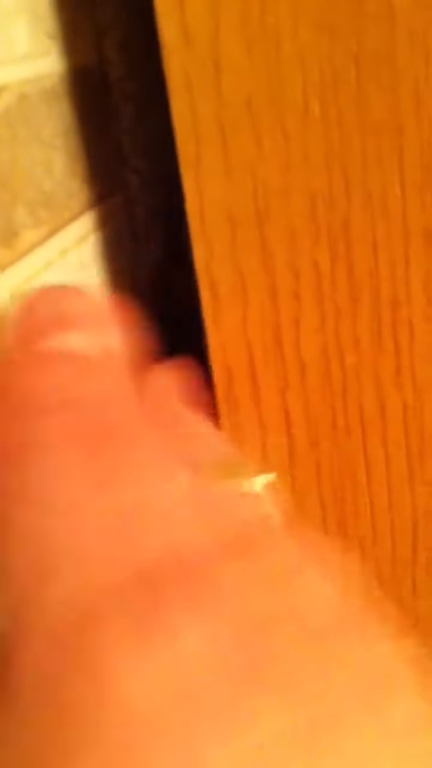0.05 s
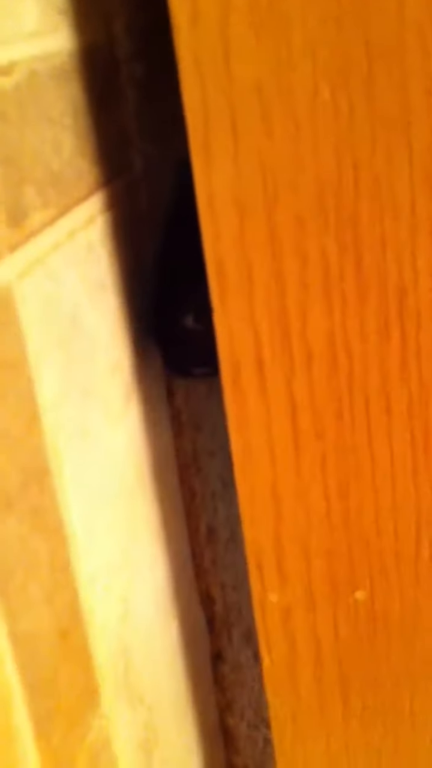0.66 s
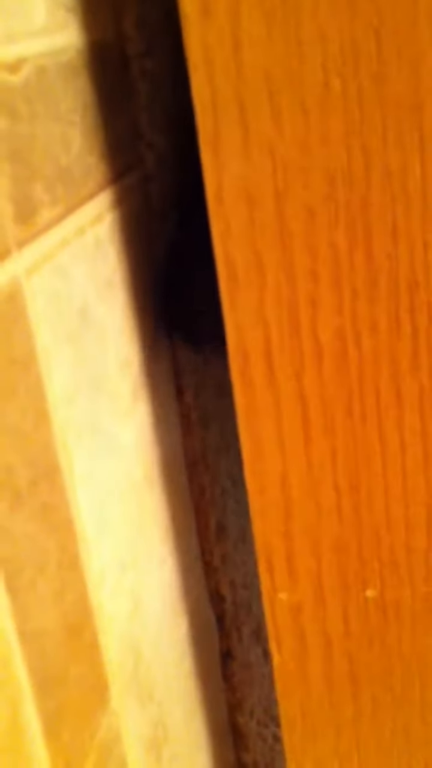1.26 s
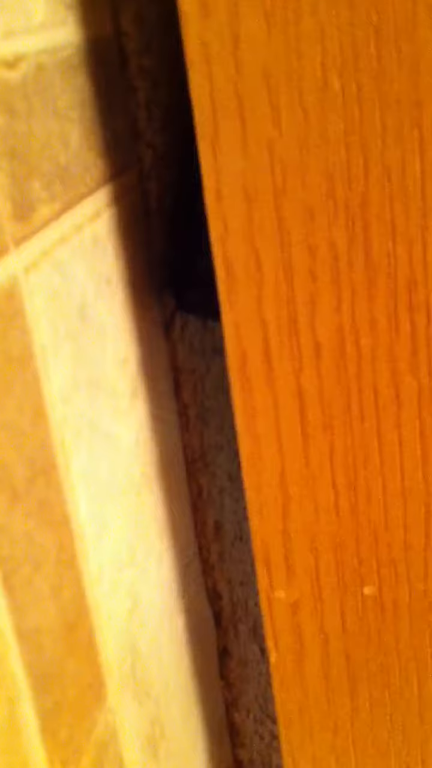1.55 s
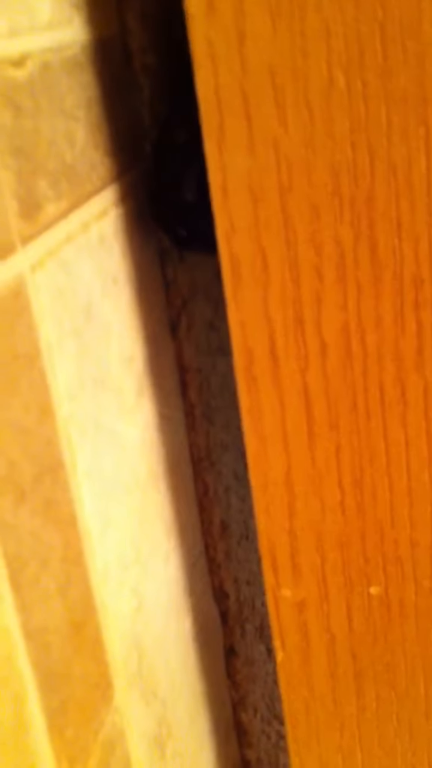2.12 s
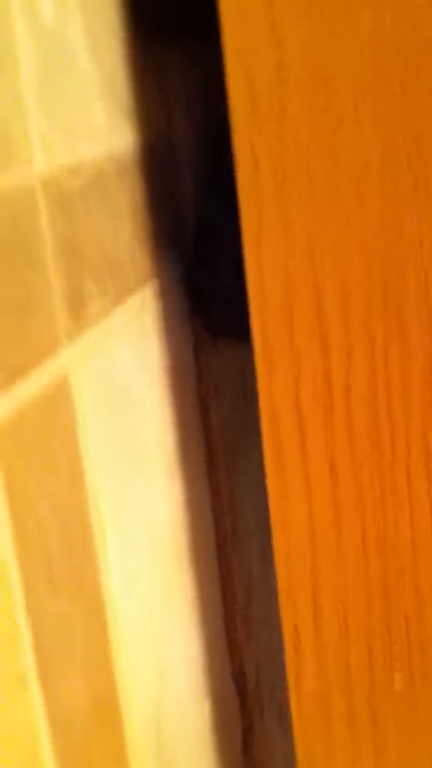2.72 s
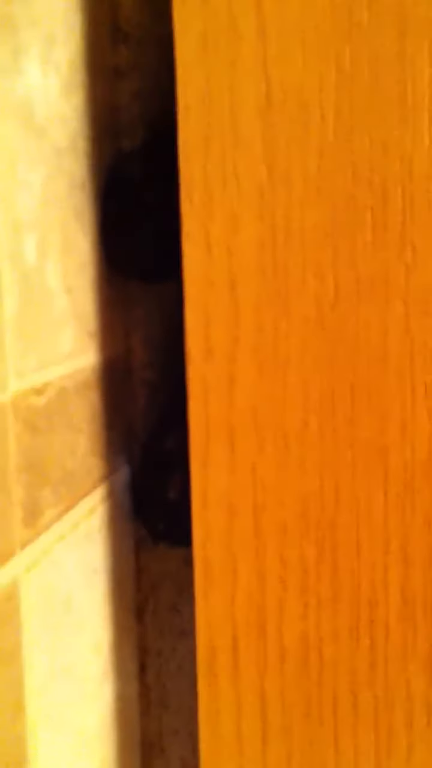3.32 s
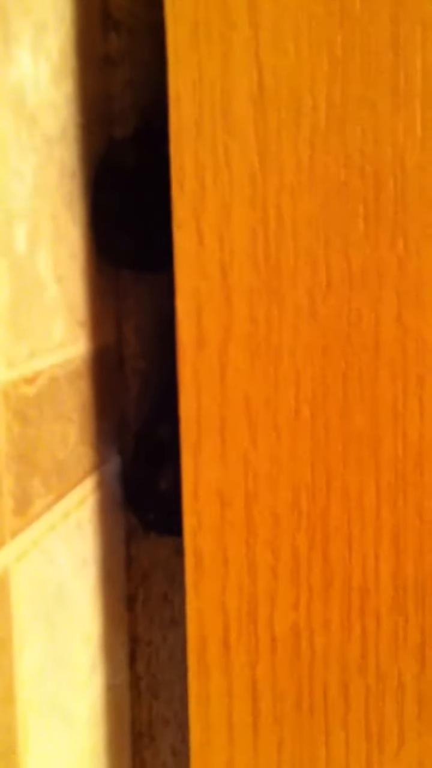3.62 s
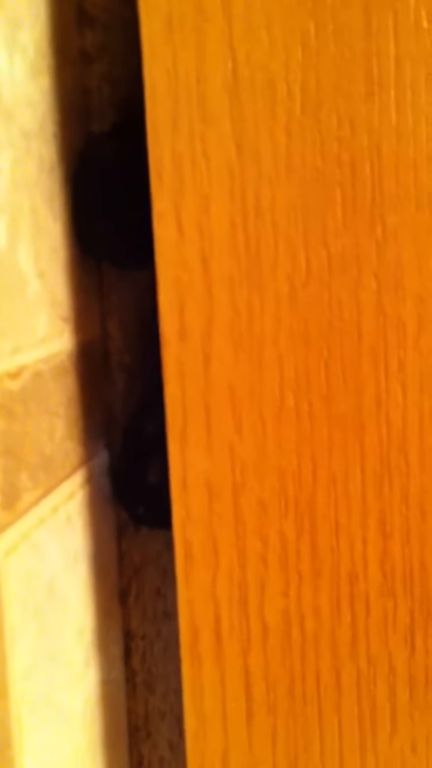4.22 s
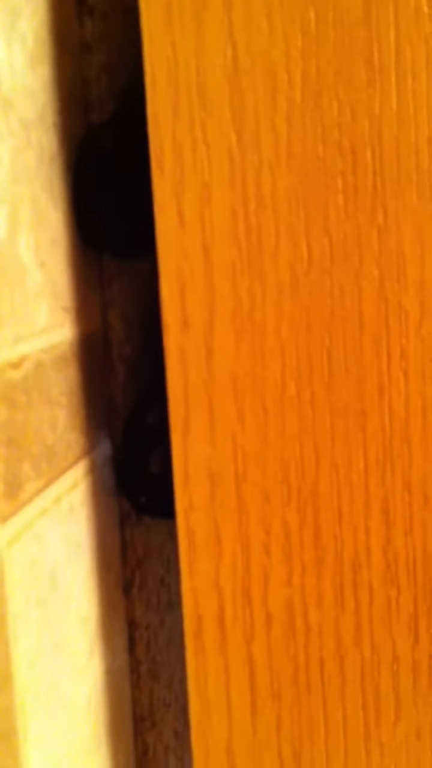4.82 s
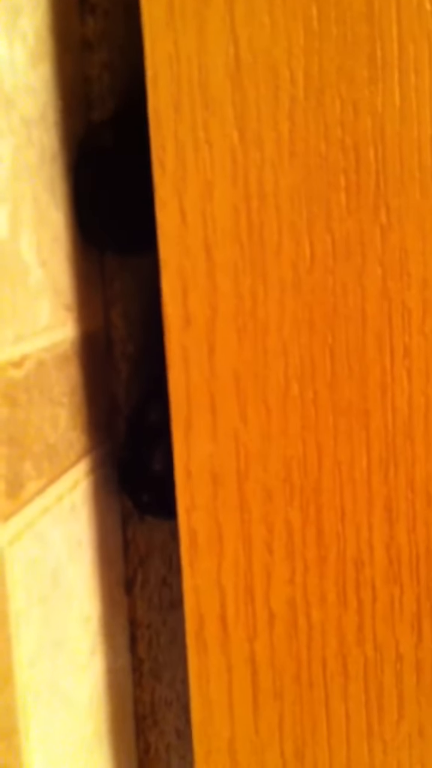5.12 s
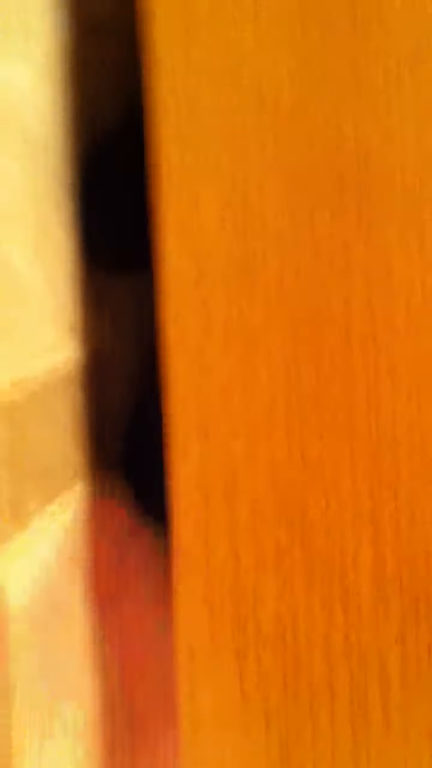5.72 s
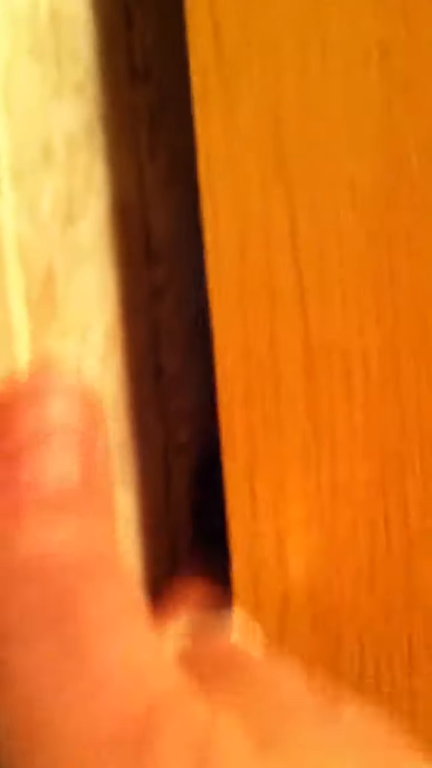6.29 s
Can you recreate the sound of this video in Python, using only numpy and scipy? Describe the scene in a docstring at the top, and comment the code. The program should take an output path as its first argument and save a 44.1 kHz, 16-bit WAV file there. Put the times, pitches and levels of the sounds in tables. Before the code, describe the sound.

A loose wooden door clacks three times in its frame in the first half second, while a hand drags and brushes over the wood. From about 1.0 to 2.8 seconds, four fingers drum eight quick rolls on the door's edge, roughly four rolls a second. Each tap is a faint nail tick followed by a soft thump that briefly rings the panel. A few light touches trail off by 3.2 seconds. In the pause there is only quiet hiss, a very faint thin whine and a slight swell of distant hum around 4.3 seconds. A small click at 5.0 leads into three firmer rolls, lasting until 5.6. Sharp wooden knocks follow, loudest in a tight cluster at 6.0, then lighter knocks and skin sliding off the wood until about 6.3. Everything is close to the microphone, with the short echo of a small tiled room.

```python
"""Fingers drumming on a wooden door

Close microphone, small tiled room. Four fingers roll on the door's edge, eight times and then three more.
Each tap is a faint nail tick, then a soft push of the fingertip that thumps the panel and rings it.
At the start the loose door clacks in its frame; a hand drags and slides on the wood, and knocks near the
end. Underneath lie a quiet hiss, a thin whine and one faint swell of far-off hum."""
import sys
import numpy as np
from scipy import signal
from scipy.fft import rfft, irfft
from scipy.io import wavfile

SR = 44100
rng = np.random.default_rng(int(sys.argv[2]) if len(sys.argv) > 2 else 0)


def master(y):
    """Save y as 16-bit WAV."""
    cut = np.clip(np.atleast_2d(y).T, -1, 1)
    pcm = np.round(cut * 32767)  # scale
    wavfile.write(sys.argv[1], SR, pcm.astype(np.int16))


N = 280023
TIME = np.arange(N) / SR

# The tiled room's decay. Each row: frequency in Hz, time to fall 60 dB in seconds.
ROOM_DECAY = [(100, 0.82), (400, 0.25), (1000, 0.55), (3000, 0.39), (12000, 0.034)]
# Spectra of the room air, a clack, a blow on wood, sliding skin and a nail tick.
# Each row: frequency in Hz, relative level in dB.
AIR_COLOUR = [(15, -86), (25, -18), (44, -24), (87, -35), (102, -12), (123, -5.5), (153, -12.5), (236, -7),
              (326, -12.5), (416, -8.5), (560, -17.5), (863, -17), (2760, -21), (14800, -25), (16000, -23)]
CLACK_COLOUR = [(60, -26), (200, 3.5), (500, 11.5), (1000, 2), (1900, -1), (2500, -9.5), (4000, -16),
                (7000, -25.5), (16000, -45)]
WOOD_COLOUR = [(60, -7.5), (130, 1), (220, 2.5), (300, -2.5), (400, 0), (660, -6.5), (830, -9.5),
               (1040, -7.5), (1600, -17), (2600, -15.5), (4000, -17.5), (8000, -25), (16000, -20.5)]
SLIDE_COLOUR = [(700, -19), (1100, 2), (1350, 12), (1900, 4.5), (2700, 7.5), (3500, 3.5), (4500, 6.5),
                (6500, 2.5), (11000, 3.5), (14000, 2.5), (16000, -22)]
TICK_COLOUR = [(300, 1), (900, 9), (1400, 2.5), (2000, 11.5), (2700, 5), (3600, 2.5), (4600, 1), (6200, 0),
               (11000, 2.5), (16000, -8)]
# Modes of the frame and of the door's stile, hard edge and panel. Each row: frequency in Hz, relative level in
# dB, time to fall 60 dB in seconds.
FRAME_MODES = [(369, -6, 0.73), (515, -11, 1), (552, -15, 0.26), (672, -4, 0.23), (950, -9, 0.08),
               (1030, 3, 0.11), (1255, 4, 0.081), (1403, 11, 0.077), (1660, -20, 0.075), (1950, 5.5, 0.072)]
STILE_MODES = [(186, -2, 0.18), (305.4, 5.5, .17), (337, 3, 0.17), (570, -4.5, 0.16), (656.5, 5.5, 0.081),
               (1032, -13, 0.12), (1225, -17, 0.051)]
EDGE_MODES = [(1490, 8.5, 0.014), (2530, 3, 0.014), (3150, -2.5, 0.013), (4150, -19, 0.019)]
PANEL_MODES = [(118, -18, .15), (142, -21, .38), (179, -14.5, .38), (208, -15.5, .4), (253, -8, .11),
               (282, -25, .5), (309, -13, .18), (341, -25, .5), (373, -15, .44), (415, -2, .24),
               (443, -8, .11), (495, -16, .4), (547, -10, .45), (601, -17, .45), (650, -14, .35),
               (696, -2, .28), (806, -14, .3), (886, -5, .2), (985, 0, .13), (1040, 0, .17)]
# The loose door meeting its frame. Each row: start in seconds, level in dB.
CLACKS = [(.002, -21), (.162, -15), (.331, -18)]
# Skin brushing lightly over the varnish, and fingers flicking off it.
# Each row: peak time in seconds, level in dB, swell length in seconds.
BRUSHES = [(0.13, -66, 0.36), (0.574, -49, 0.058), (1.38, -69.5, 0.52), (5.728, -58, 0.051),
           (6.008, -64.5, 0.48)]
FLICKS = [(1.811, -62.5, 0.071), (1.932, -58, 0.07), (6.07, -46, 0.036), (6.2505, -34, 0.0035),
          (6.264, -55, 0.087)]
# Pressed skin dragging on the wood, building up and letting go.
# Each row: peak time in seconds, level in dB, swell length in seconds, upper cutoff in Hz.
DRAGS = [(0.11, -46.5, 0.14, 180), (0.141, -51.5, 0.087, 2720), (0.306, -57, 0.17, 198),
         (0.568, -47, .02, 4460), (5.765, -53, 0.043, 2200), (5.984, -49, 0.15, 1710),
         (6.206, -54, 0.11, 284), (6.302, -58, 0.11, 7200)]
# Knocks of a nail or ring, crisp when square-on, crunchy when glancing.
# Each row: start in seconds, level in dB, upper cutoff in Hz, crunch decay in ms.
KNOCKS = [(4.973, -32.5, 9100, 3.3), (5.659, -20.5, 7500, 5), (5.7258, -14.5, 4470, 2.7),
          (5.9102, -20, 1980, 0.36), (5.9823, -13.5, 1700, 2.2), (5.993, -10, 1990, 1.1),
          (6.0033, -8.5, 2350, 1.4), (6.009, -13, 1010, 1.5), (6.184, -25, 910, 4), (6.202, -25, 9200, 3.4)]
# Single fingers barely touching. Each row: time in seconds, push in dB, half-width of the push in ms.
TOUCHES = [(2.8417, -26.5, 0.66), (3.075, -39, 1.1), (3.188, -37, 1.46)]
# The four fingers in landing order, at a usual push.
# Each row: half-width of the push in ms, relative tick level in dB, typical graze decay in ms.
FINGERS = [(.45, -49, 2.2), (.66, -49, 2.2), (.67, -49.5, 2), (.84, -44.5, .9)]
# The drumming. Each row: one roll, with a time in seconds and a push in dB for each finger.
ROLLS = [
    [(1.0316, -19.5), (1.059, -28.5), (1.098, -17.5), (1.1481, -13)],
    [(1.2379, -14), (1.2675, -21), (1.307, -14.5), (1.3717, -15)],
    [(1.4778, -19), (1.4918, -12.5), (1.534, -14.5), (1.5931, -16)],
    [(1.6877, -26), (1.7105, -16), (1.7508, -17), (1.8104, -15)],
    [(1.921, -13), (1.9419, -15.5), (1.9749, -16), (2.0273, -13)],
    [(2.1441, -15), (2.169, -13.5), (2.1996, -16), (2.2665, -13.5)],
    [(2.3761, -14), (2.4043, -17.5), (2.4444, -15.5), (2.4949, -17)],
    [(2.6155, -17), (2.6392, -16), (2.6616, -16), (2.7232, -19.5)],
    [(5.1023, -23.5), (5.1209, -14.5), (5.1424, -15.5), (5.2185, -11)],
    [(5.3146, -10), (5.3337, -12), (5.3744, -13.5), (5.4483, -9.5)],
    [(5.5371, -11), (5.5559, -12), (5.5958, -15.5), (5.6625, -38)],
]


def undb(db):
    """Decibels to gain."""
    return 10 ** (np.asarray(db) / 20)


def lookup(points, hz):
    """Read (Hz, value) points on a log-frequency axis."""
    f, value = np.transpose(points)
    return np.interp(np.log(np.maximum(hz, 1)), np.log(f), value)


def unit(x):
    """Scale to unit energy."""
    return x / np.sqrt(np.sum(x ** 2))


def convolve(x, response):
    """Pass a sound through an impulse response."""
    return signal.fftconvolve(x, response)[:len(x)]


def colour(points, size=4096):
    """Minimum-phase, unit-energy response with the given spectrum."""
    gain = undb(lookup(points, np.fft.rfftfreq(size, 1 / SR)))
    cepstrum = irfft(np.log(gain))
    cepstrum[1:size // 2] *= 2
    cepstrum[size // 2 + 1:] = 0
    return unit(irfft(np.exp(rfft(cepstrum))))


def cut(x, hz, kind="low", order=2):
    """Butterworth filter."""
    sos = signal.butter(order, np.minimum(hz, SR / 2 - 1), kind, fs=SR, output="sos")
    return signal.sosfilt(sos, x)


def add(track, s, sound):
    """Mix a sound in at s seconds."""
    i = max(int(s * SR), 0)
    track[i:i + len(sound)] += sound[:max(N - i, 0)]


def swell(peak_s, length_s, rise_share):
    """Exponential rise to a peak and fall from it; the two time constants add up to length_s."""
    rise = (peak_s - TIME) / rise_share
    fall = (TIME - peak_s) / (1 - rise_share)
    return np.exp(-np.maximum(rise, fall) / length_s)


def ring(modes, t):
    """Decaying modes; neighbours swing in opposite directions."""
    return sum((-1) ** k * undb(db - 60 * t / t60) * np.sin(2 * np.pi * hz * t)
               for k, (hz, db, t60) in enumerate(modes))


def room(onset_s=0.00082):
    """Dense reflections from nearby tiles and walls; the highest treble dies first."""
    t, tail = TIME[:SR], 0
    for hz in 62.5 * 2 ** np.arange(9):
        octave = cut(rng.standard_normal(SR), [hz / np.sqrt(2), hz * np.sqrt(2)], "band")
        tail = tail + octave * undb(-60 * t / lookup(ROOM_DECAY, hz))
    return unit(tail * (1 - np.exp(-(t / onset_s) ** 2)))


def background(hum_hz=410, lift_hz=18.2, whine_hz=15000):
    """Room air and microphone hiss, an electronic whine, and a far-off hum that sharpens as it swells."""
    hiss = undb(-67.5) * convolve(rng.standard_normal(N), colour(AIR_COLOUR))
    strength = swell(peak_s=4.25, length_s=.35, rise_share=.65)
    hum_phase = 2 * np.pi * np.cumsum(hum_hz + lift_hz * strength) / SR
    hum = undb(-70) * strength * np.sin(hum_phase)
    whine = undb(-88) * np.sin(2 * np.pi * whine_hz * TIME)
    return hiss + hum + whine


def clacks(walls, ring_db=-3, room_db=-1):
    """The door meets its frame further from the microphone, so ring and room rival the blow."""
    blows = np.zeros(N)
    for s, db in CLACKS:
        add(blows, s, undb([db]))
    crack = convolve(blows, colour(CLACK_COLOUR))
    frame = convolve(blows, unit(ring(FRAME_MODES, TIME[:SR])))
    return crack + undb(ring_db) * frame + undb(room_db) * convolve(crack, walls)


def friction(grain_db=2.5):
    """Skin catches and slips in tiny grains of uneven strength."""
    grains = rng.standard_normal(N) * undb(grain_db * rng.exponential(size=N))
    return grains / grains.std()


def rubbing(walls, drag_octaves=3.8, room_db=-6):
    """A hand moves over the door: light skin only hisses, pressed skin rasps the wood."""
    hiss = convolve(friction(), colour(SLIDE_COLOUR))
    brushing = sum(undb(db) * swell(s, length, rise_share=.45) for s, db, length in BRUSHES)
    flicking = sum(undb(db) * swell(s, length, rise_share=.16) for s, db, length in FLICKS)
    sound = brushing * cut(hiss, 1000, "high") + flicking * cut(hiss, 3240, "high", order=4)
    for s, db, length, top_hz in DRAGS:
        wood = cut(colour(WOOD_COLOUR), top_hz)
        rasp = unit(cut(wood, top_hz / 2 ** drag_octaves, "high"))
        stroke = friction() * swell(s, length, rise_share=.93)
        sound += undb(db) * convolve(stroke, rasp)
    return sound + undb(room_db) * convolve(sound, walls)


def knocks(walls, crunch_gain=0.81, ring_db=-5, low_hz=190, room_db=-10):
    """A sharp blow with a short crunch rings the door's stile, and the room answers."""
    blows, t = np.zeros(N), TIME[:SR // 5]
    for s, db, top_hz, crunch_ms in KNOCKS:
        crunch = unit(rng.standard_normal(len(t)) * np.exp(-1000 * t / crunch_ms))
        blow = signal.unit_impulse(len(t)) + crunch_gain * crunch
        add(blows, s, undb(db) * cut(blow, top_hz))
    body = cut(convolve(blows, colour(WOOD_COLOUR)), low_hz, "high")
    stile = convolve(blows, unit(ring(STILE_MODES, t)))
    sound = body + undb(ring_db) * stile
    return sound + undb(room_db) * convolve(sound, walls)


def nail(graze_ms, decay_scatter=0.49, snap_gain=0.65, colour_scatter_db=2):
    """One nail contact: a snap and a brief graze, a little different each time."""
    t = TIME[:SR // 50]
    decay_s = graze_ms / 1000 * np.exp(decay_scatter * rng.standard_normal())
    graze = unit(rng.standard_normal(len(t)) * np.exp(-t / decay_s))
    snap = snap_gain * signal.unit_impulse(len(t))
    tint = [(hz, db + colour_scatter_db * rng.standard_normal()) for hz, db in TICK_COLOUR]
    return convolve(unit(snap + graze), colour(tint))


def edge(ticks, ring_db=-11):
    """Nail ticks together with the brief hollow ring of the door's edge."""
    hollow = convolve(ticks, unit(ring(EDGE_MODES, TIME[:SR // 10])))
    return ticks + undb(ring_db) * hollow


def panel(push, flex_hz=385, flex_width_hz=367, ring_db=41, spread_s=.004):
    """The wood gives way under the finger in one quick swing; then the whole panel rings."""
    omega, damping = 2 * np.pi * flex_hz, 2 * np.pi * flex_width_hz
    flex = signal.bilinear([1, 0, 0], [1, damping, omega ** 2], SR)
    thump = signal.lfilter(*flex, push)
    modes = ring(PANEL_MODES, np.maximum(TIME[:SR] - spread_s, 0))
    return undb(ring_db) * convolve(push, modes) / SR - thump


def taps(usual_push_db=-15, hardening=.27, tick_growth=.57, touch_tick_db=-29.5, touch_graze_ms=2.4):
    """Every fingertip contact. In a roll a harder push is shorter; the tick grows less than the push."""
    for roll in ROLLS:
        for (s, push_db), (width_ms, tick_db, graze_ms) in zip(roll, FINGERS):
            extra_db = push_db - usual_push_db
            width_scale = undb(-hardening * extra_db)
            yield s, push_db, width_ms * width_scale, tick_db + tick_growth * extra_db, graze_ms
    for s, push_db, width_ms in TOUCHES:
        yield s, push_db, width_ms, push_db + touch_tick_db, touch_graze_ms


def drumming(walls, crest_db=-36, stiffening=7, tick_boost_db=15, lead_widths=4):
    """Right by the microphone the nail grazes first, then the pad lands; a longer push sounds deeper."""
    pushes, nails, t = np.zeros(N), np.zeros(N), TIME[:SR // 50]
    for s, push_db, width_ms, tick_db, graze_ms in taps():
        width_s = width_ms / 1000
        bell = np.exp(-.5 * ((t - t.mean()) / width_s) ** 2)
        crest = undb(crest_db) * bell ** stiffening  # the pad stiffens as it flattens
        add(pushes, s - t.mean(), undb(push_db) * (bell + crest))
        add(nails, s - lead_widths * width_s, undb(tick_db + tick_boost_db) * nail(graze_ms))
    wood, ticks = panel(pushes), edge(nails)
    # the panel's bass stays near the door; its higher notes reach the walls
    to_walls = undb(-10) * cut(wood, 550, "high", order=1) + undb(-11) * ticks
    return wood + ticks + convolve(to_walls, walls)


def scene(port_hz=106):
    """One room, one microphone; its port cuts the contacts' bass steeply, leaving a little low thud."""
    walls = room()
    handling = cut(clacks(walls) + knocks(walls) + rubbing(walls), 111, "high")
    contacts = drumming(walls) + handling
    above_port = cut(contacts, port_hz, "high", order=6)
    low_thud = undb(-11.5) * cut(contacts, 78)
    return (above_port + low_thud + background())[None]


def record(dry, top_hz=16000):
    """The recorder cuts the top treble steeply."""
    return signal.sosfilt(signal.ellip(8, .2, 70, top_hz, fs=SR, output="sos"), dry)


dry = scene()
out = record(dry)
master(out)
```